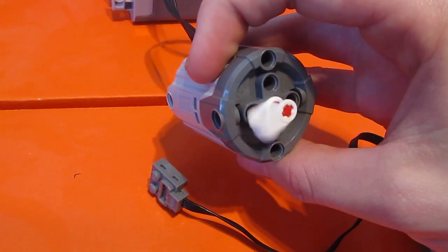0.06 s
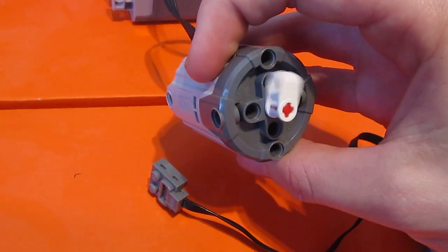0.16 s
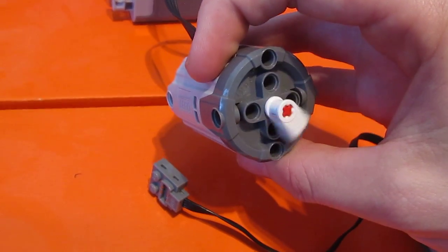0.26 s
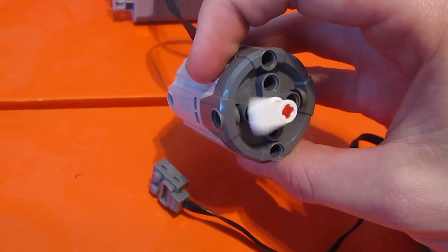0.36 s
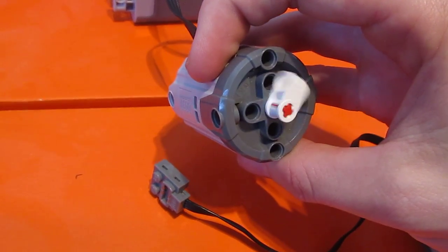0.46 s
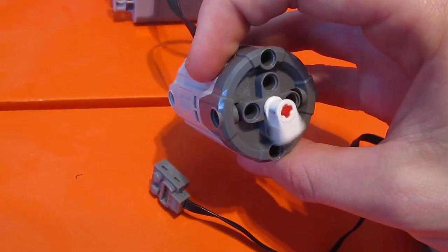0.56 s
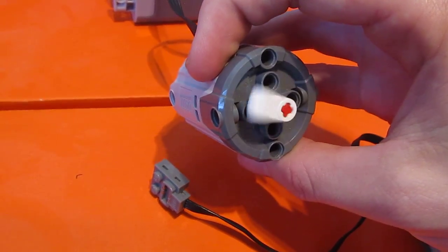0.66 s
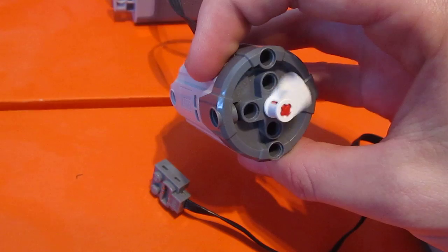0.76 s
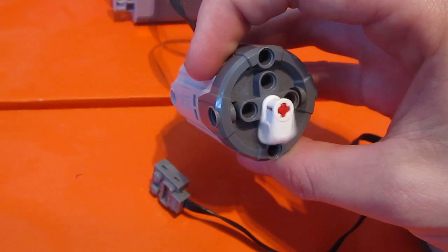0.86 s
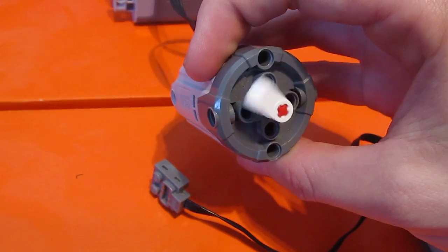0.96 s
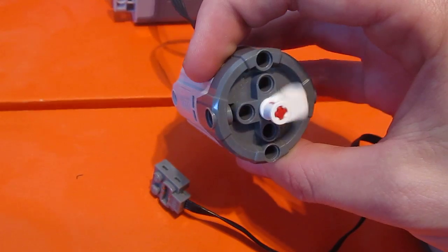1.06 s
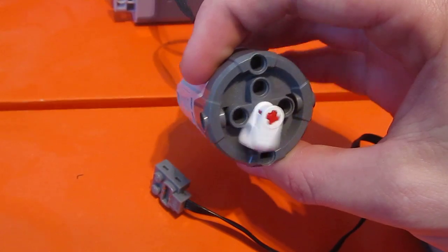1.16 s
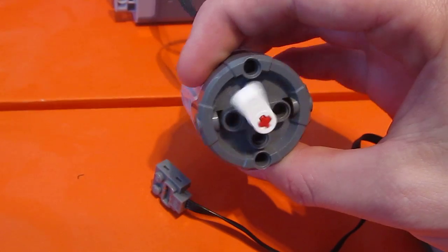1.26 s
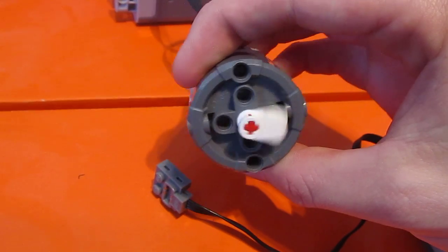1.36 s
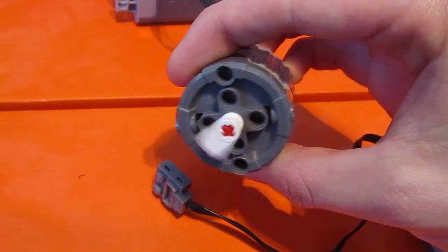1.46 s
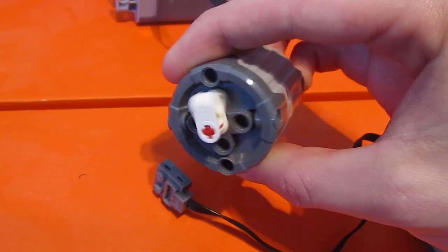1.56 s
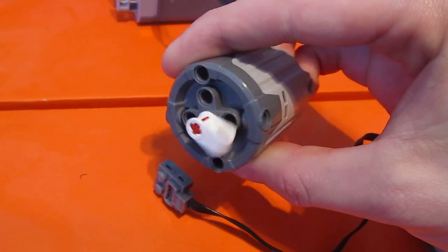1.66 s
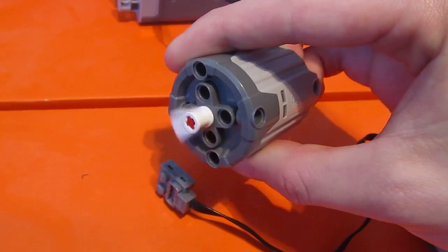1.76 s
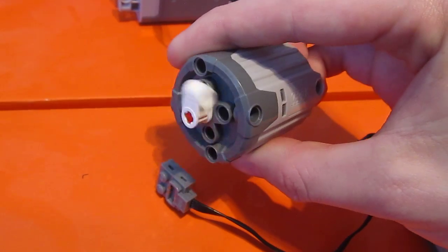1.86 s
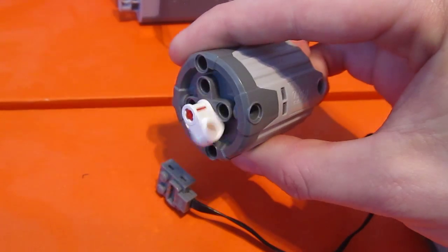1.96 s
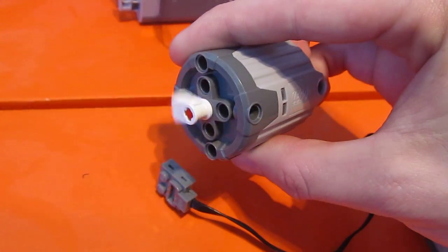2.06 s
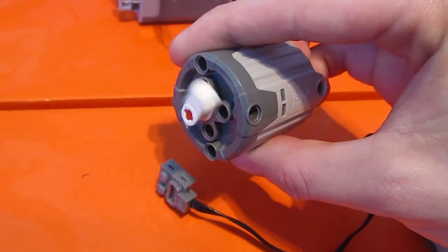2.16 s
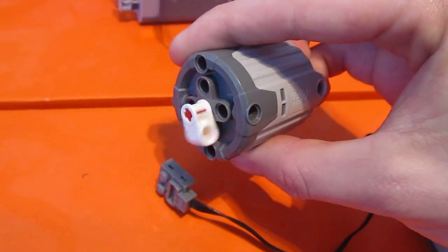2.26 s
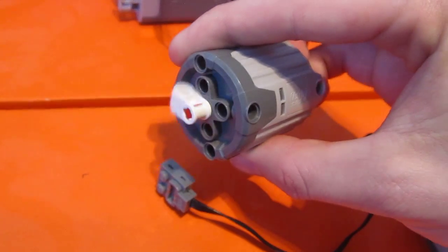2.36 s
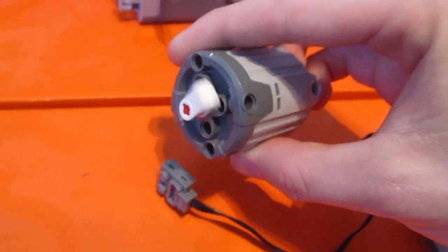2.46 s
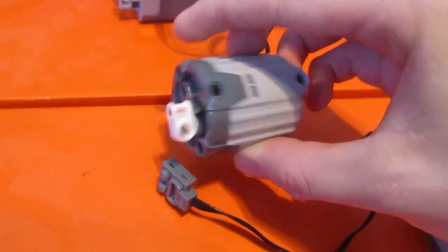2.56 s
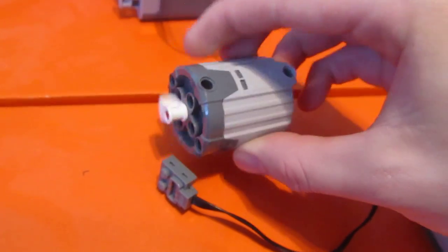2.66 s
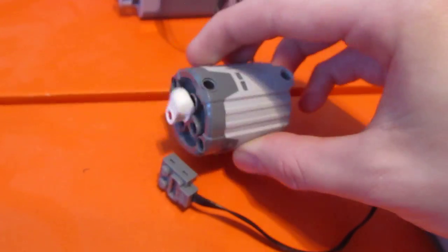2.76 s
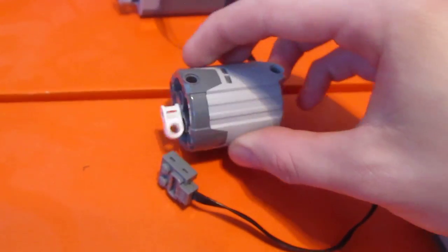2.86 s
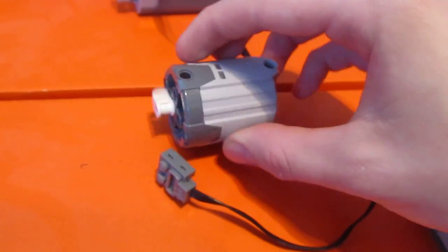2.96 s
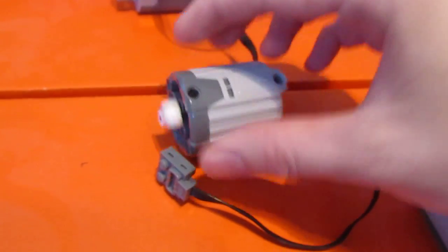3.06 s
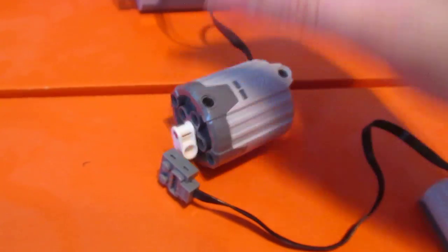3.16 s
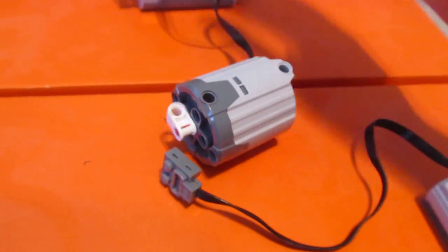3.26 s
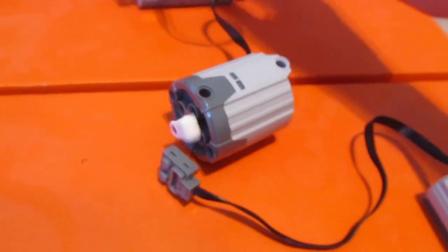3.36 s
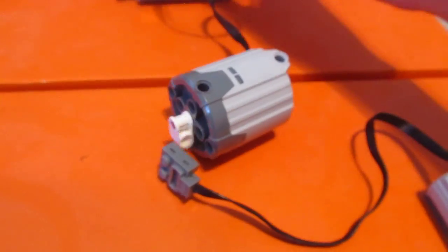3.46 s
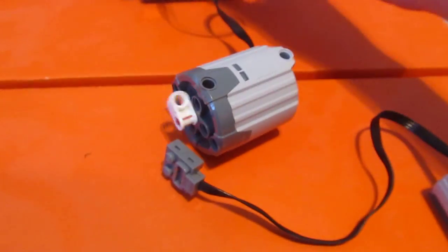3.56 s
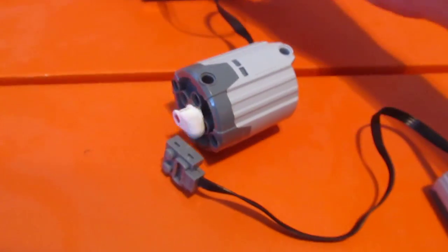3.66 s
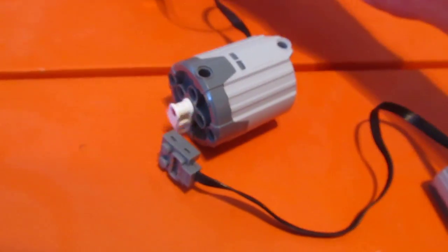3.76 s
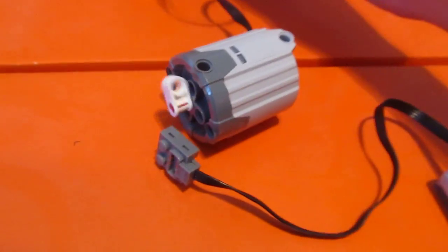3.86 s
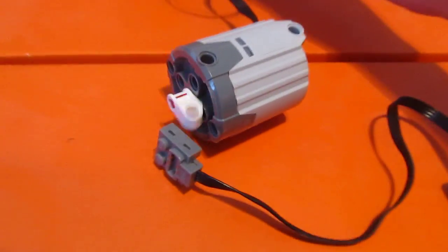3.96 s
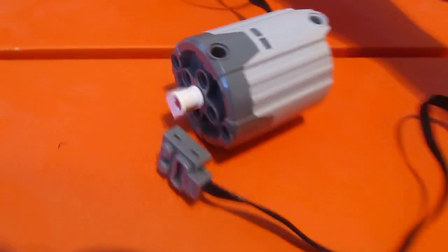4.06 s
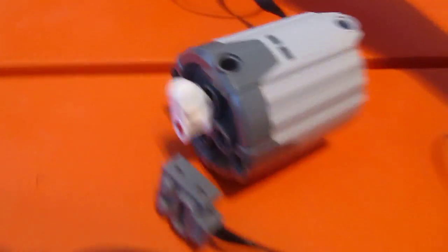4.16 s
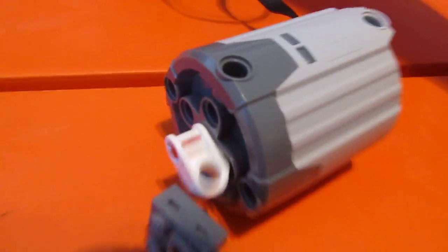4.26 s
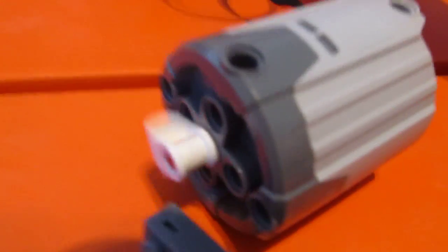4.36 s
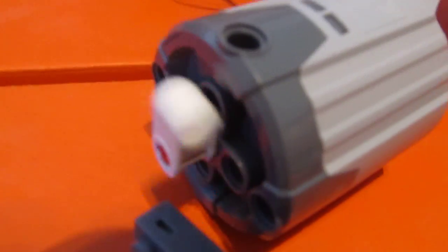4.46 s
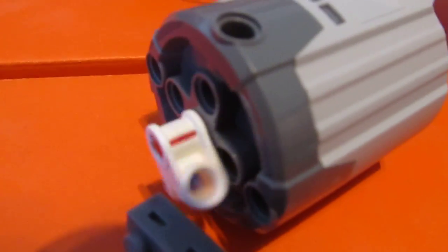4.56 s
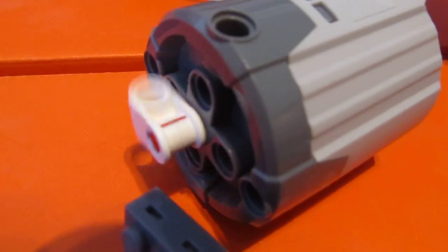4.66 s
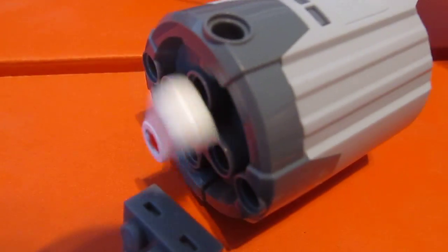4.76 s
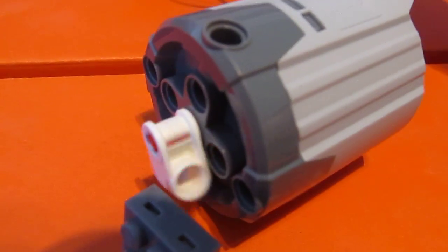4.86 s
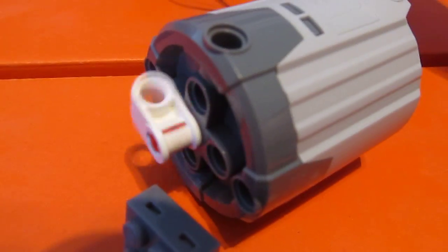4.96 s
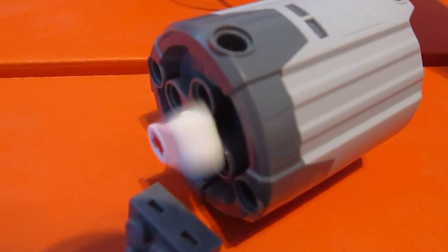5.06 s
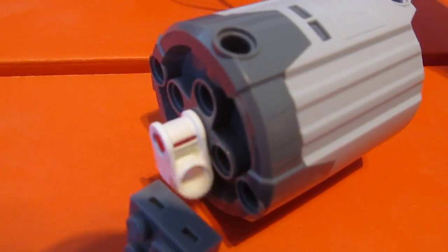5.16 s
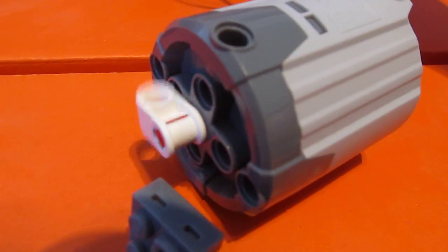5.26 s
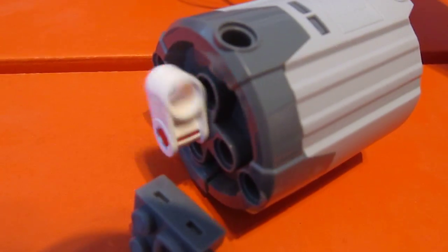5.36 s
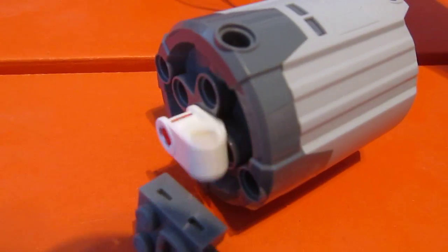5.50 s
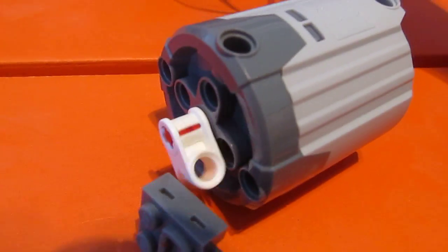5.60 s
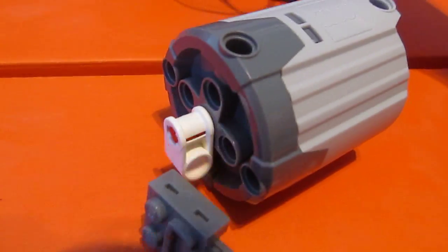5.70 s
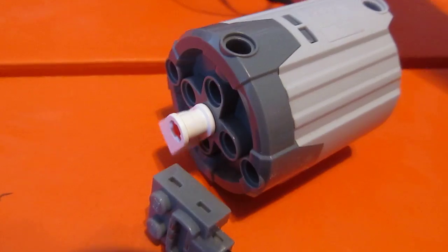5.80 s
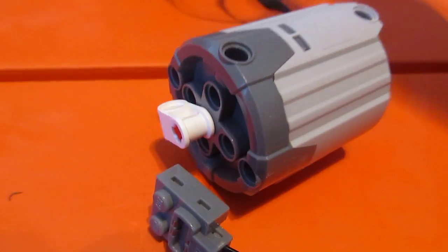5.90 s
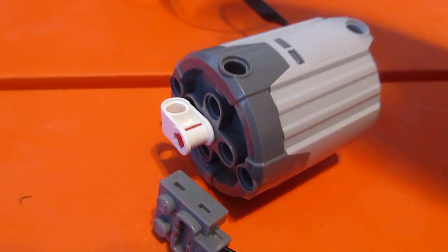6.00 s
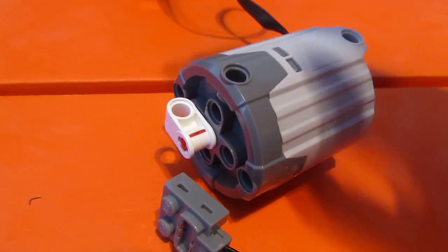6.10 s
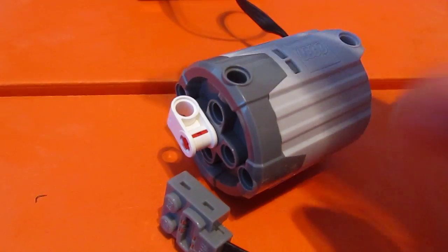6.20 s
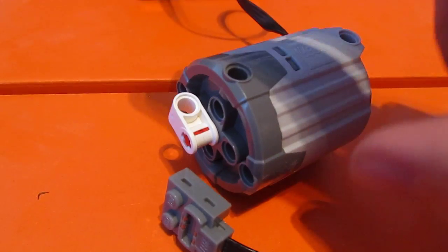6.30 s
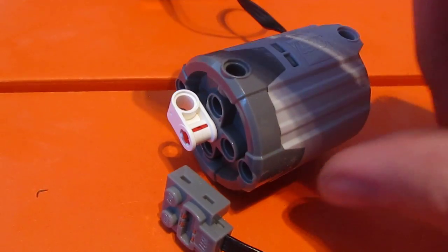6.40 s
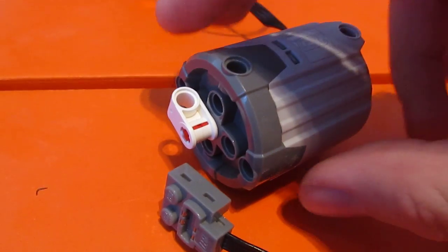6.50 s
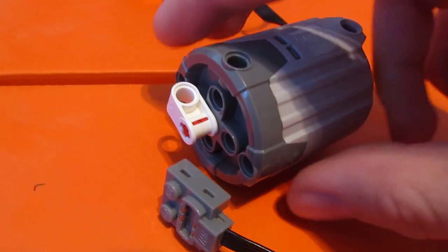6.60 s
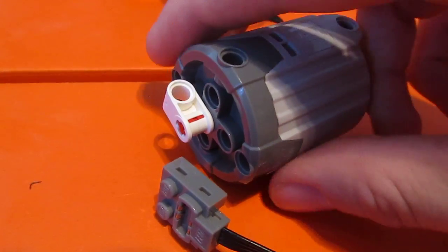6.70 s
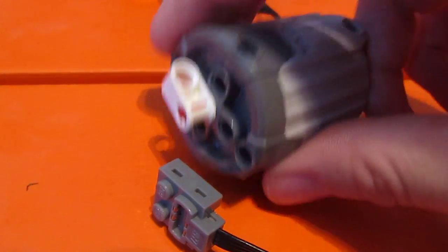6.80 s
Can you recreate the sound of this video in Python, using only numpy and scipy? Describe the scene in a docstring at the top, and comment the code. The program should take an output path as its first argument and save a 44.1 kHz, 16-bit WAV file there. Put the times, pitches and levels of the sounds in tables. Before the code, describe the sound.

A small geared toy motor runs steadily in a hand, its plastic teeth rattling and rasping. It is set down on a plastic table with two quick clusters of hard knocks, and the tabletop then hums and buzzes along with it. The power cuts and the motor winds down, falling in pitch, with a few last gear ticks. Fingers faintly tap and rub the housing. The sound is close, in a quiet room.

```python
"""In a quiet room, a small geared toy motor runs in a hand, its teeth rattling and scraping.
It is turned side-on and set down on a plastic table, which thuds and then buzzes with it.
The power is cut: the rotor coasts to a stop with a few last ticks of the gears.
Fingers then brush the housing and nudge it. The recorder's gain ducks after the hard blows."""
import sys
import numpy as np
from scipy import signal
from scipy.fft import rfft, irfft, next_fast_len
from scipy.io import wavfile
from scipy.ndimage import uniform_filter1d

SR = 44100
rng = np.random.default_rng(int(sys.argv[2]) if len(sys.argv) > 2 else 0)


def int16_out(signal):
    """Quantize to a 16-bit WAV file."""
    q = np.round(np.clip(np.atleast_2d(signal).T, -1, 1) * 32767)
    wavfile.write(sys.argv[1], SR, q.astype(np.int16))


N = 301644
TIME = np.arange(N) / SR
FFT_SIZE = 2 * next_fast_len(N // 2 + 8192)
FREQ = np.maximum(np.arange(FFT_SIZE // 2 + 1) * SR / FFT_SIZE, 1)
RUN_HZ = 127.2   # turns per second of the rotor, the motor's spinning core
GEAR_RATIO = 6   # rotor turns per turn of the carrier, which holds the small planet gears

# the housing hits the table: (time [s], level [dB], brightness [Hz])
BLOWS = [(2.8276, -10, 1100), (2.8505, 1.5, 2400), (2.8627, -5, 1000), (3.1448, -4, 1600),
         (3.1473, -8, 2200), (3.157, -13, 1300), (3.1947, 4, 1840), (3.2051, -0.5, 1015),
         (6.6578, -29.5, 1000), (6.78, -31.5, 1100), (6.794, -33, 1400), (6.805, -30, 2530),
         (6.8102, -34, 2500)]
# stereo spread of the lying motor, and the default: (frequency [Hz], side minus mid [dB])
WIDTH_LYING = [(300, -18), (2300, -10), (3700, -9.5), (4400, -2), (5000, -7), (8000, -3), (14000, -3)]
# its lean to the left or right: (frequency [Hz], left minus right [dB])
PAN_LYING = [(1000, 0), (2200, -2.5), (3000, 1.5), (4000, -8), (5000, 2.5), (5600, -7), (6400, 5),
             (7700, -2.5), (11000, -2), (13500, -6.5)]


def from_db(db):
    """Turn decibels into a gain."""
    return 10 ** (np.asarray(db) / 20)


def unit_power(x):
    """Scale to an average power of 1."""
    return x / np.sqrt(np.mean(x ** 2) + 1e-20)


def in_time(rows):
    """Draw lines through (time, values...) rows: one curve per value column."""
    times, *columns = np.transpose(rows)
    return [np.interp(TIME, times, column) for column in columns]


def gains(points):
    """Turn (Hz, dB) rows into a gain at every frequency."""
    hz, db = np.transpose(points)
    return from_db(np.interp(np.log(FREQ), np.log(hz), db))


def body(colour, ripple_db=2.0):
    """How an object filters sound: a broad tone colour with many narrow peaks."""
    ripple = np.interp(FREQ, np.arange(1500, 16500, 75), rng.standard_normal(200), left=0)
    cepstrum = irfft(np.log(unit_power(gains(colour) * from_db(ripple_db * ripple))))
    # minimum phase: the object rings after a hit, never before
    cepstrum[1:FFT_SIZE // 2] *= 2
    cepstrum[FFT_SIZE // 2 + 1:] = 0
    return np.exp(rfft(cepstrum))


def radiate(pair, colour, width=WIDTH_LYING, pan=PAN_LYING, direct=.5):
    """Send a mid (centre) and a side signal through an object, out to left and right."""
    mid, side = rfft(pair, FFT_SIZE) * body(colour)
    # the direct sound reaches the left a little later
    side = (np.sqrt(1 - direct ** 2) * side - 1j * direct * mid) * gains(width)
    lean = gains(pan)
    left_right = np.array([(mid + side) * lean, mid - side]) * 2 / (1 + lean)
    return irfft(left_right)[:, :N]


def drift(per_s):
    """A random wandering curve of power 1."""
    points = rng.standard_normal(int(N / SR * per_s) + 2)
    return unit_power(np.interp(TIME * per_s, np.arange(len(points)), points))


def grains(per_s, spread_db):
    """Tiny random contacts of uneven size, as a mid and side pair."""
    touches = rng.random(N) < per_s / SR
    sizes = from_db(spread_db * np.clip(rng.standard_normal(N), -2, 2))
    return unit_power(touches * sizes * rng.standard_normal((2, N)))


def beats(cycles, jitter_ms, spread_db):
    """One click per cycle, a little uneven in time and size."""
    at = np.flatnonzero(np.diff(np.floor(cycles)) > 0)
    late, size = rng.standard_normal((len(at), 2)).T
    at = at + (late * jitter_ms * 1e-3 * SR).astype(int)
    out = np.zeros(N)
    out[np.clip(at, 0, N - 1)] = from_db(spread_db * np.clip(size, -2, 2))
    return out


def clicks(rows):
    """One click for each row that starts with (time [s], level [dB])."""
    out = np.zeros(N)
    for s, db, *_ in rows:
        out[round(s * SR)] += from_db(db)
    return out


def fade(hits, t60):
    """Give each click a tail that falls 60 dB in t60 seconds."""
    return signal.lfilter([1], [1, -from_db(-60 / (t60 * SR))], hits + 1e-18)


def even(pair):
    """Level out slow changes in loudness and keep the fast pulsing."""
    return pair / np.sqrt(np.abs(uniform_filter1d(pair[0] ** 2, SR // 7)) + 1e-9)


def ring(hits, hz, t60):
    """Each click starts a dying sine wave."""
    decay, angle = from_db(-60 / (t60 * SR)), 2 * np.pi * hz / SR
    return signal.lfilter([0, np.sin(angle)], [1, -2 * decay * np.cos(angle), decay ** 2], hits + 1e-18)


def after(s, blend_s):
    """A smooth step from 0 to 1 around time s."""
    return .5 + .5 * np.tanh((TIME - s) / blend_s)


def stroke(s, hold_s, attack_s, t60):
    """A curve that rises, holds and dies away."""
    rise = np.clip((TIME - s) / attack_s, 0, 1)
    return rise * from_db(-60 * np.maximum(TIME - s - hold_s, 0) / t60)


def filtered(x, keep, hz, order=2):
    """Keep the "low" or the "high" side of a frequency."""
    return signal.sosfilt(signal.butter(order, hz, keep, fs=SR, output="sos"), x + 1e-18)


def rotor_speed():
    """Turns per second: steady under power, then braked by drag and dry friction."""
    power_off_s, drag_s, friction_hz_per_s = 5.06, .97, 39.2
    coasting_s = np.maximum(TIME - power_off_s, 0)
    friction_hz = friction_hz_per_s * drag_s
    return np.maximum((RUN_HZ + friction_hz) * np.exp(-coasting_s / drag_s) - friction_hz, 0)


def rotor_kicks(turns):
    """The shaft knocks once a turn, and each of the three magnetic poles adds a kick."""
    shaft = beats(turns + .25, jitter_ms=.15, spread_db=1.6)
    poles = beats(3 * (turns + .25), jitter_ms=.1, spread_db=2.0)
    return shaft, poles


def vigour(pace, loss_db, steepness):
    """Contacts soften as speed is lost, swell where the gears bind, and all but stop at a crawl."""
    # the slowing gears catch and shudder: (time [s], length [s], boost [dB])
    shudders = [(5.911, 0.038, 5.5), (6.078, 0.025, 4)]
    crawl_hz, crawl_db, running_ends_s = 17.2, -13, 6.24
    binding_db = sum(db * stroke(s, length, attack_s=.005, t60=.06) for s, length, db in shudders)
    crawling = .5 + .5 * np.tanh(2 * (crawl_hz - pace * RUN_HZ))
    slowing_db = -loss_db * np.clip(1 - pace, 0, 1) ** steepness
    return from_db(slowing_db + binding_db + crawl_db * crawling) * (1 - after(running_ends_s, 0.018))


def tooth_rasp(pressure, pace):
    """Teeth scrape more sparsely as they slow; low and high treble come from separate contacts."""
    rasp = 0
    for band, per_s, flicker_db in (("low", 11000, 1.7), ("high", 7000, 2.7)):
        contacts = grains(per_s * (0.25 + pace), spread_db=2.1) * pressure
        flicker = from_db(flicker_db * drift(500))
        rasp = rasp + filtered(unit_power(contacts * flicker), band, 9000, order=3)
    return even(rasp)


def housing(rattle, rasp):
    """The gears' tone shifts as the motor faces front, turns side-on, is lowered, lies and slows."""
    # tone of the rattle in each position: (frequency [Hz], level [dB])
    rattle_front = [(650, -46), (1100, -27), (1290, -34), (1330, -19), (1350, -15), (1780, -12.5),
                    (2230, 0.5), (2490, -2), (2920, -12), (4090, -4.5), (5200, -13.5), (6760, -42),
                    (11400, -120)]
    rattle_side = [(650, -58), (1100, -20), (1200, -33), (1250, -17.5), (1900, -7.5), (2110, -1.5),
                   (2860, -12.5), (3610, -12), (4020, -6), (4510, -13), (5200, -16.5), (6760, -22),
                   (11400, -120)]
    rattle_low = [(650, -48), (1100, -18.5), (1260, -15), (1330, -23), (1470, -8), (1770, -9), (2080, -1),
                  (2510, -3), (3210, -7), (3810, 3.5), (5200, -15.5), (6760, -43), (11400, -120)]
    rattle_lying = [(650, -39), (1100, -10.5), (1170, -15.5), (1200, -13.5), (1570, -7.5), (2000, -7),
                    (2220, -1), (2600, -3), (2950, -7.5), (3500, -1.5), (3900, -1), (4510, -11),
                    (5200, -13), (6760, -40), (11400, -120)]
    rattle_slow = [(650, -30), (1100, -9), (1240, -23), (1340, -10), (1800, -10.5), (2230, -4), (3150, -14),
                   (3570, -2), (3810, 3), (4390, -12), (5200, -19), (6760, -38), (11400, -120)]
    # tone of the rasp: (frequency [Hz], level [dB])
    rasp_front = [(2710, -45), (4600, -17), (5230, -22), (5610, -3), (6180, -5.5), (6850, 2.5), (7510, 2),
                  (8150, -7), (8890, -4), (9990, -5.5), (11000, -2), (12800, -9), (15600, -25)]
    rasp_side = [(2710, -35), (4600, -21), (5170, -13), (6000, -2), (6680, 4.5), (7660, -2), (8270, 0.5),
                 (9020, -3.5), (10700, 1), (13500, -13), (15600, -24)]
    rasp_low = [(2710, -30.5), (4600, -8), (5250, -11), (5940, -1.5), (6750, -4.5), (7280, 3.5), (7620, -5),
                (8110, -8), (8840, -4), (11000, -3.5), (12200, -6.5), (15600, -29.5)]
    rasp_lying = [(2710, -38), (4600, -20), (5250, -12.5), (6180, 0.5), (6750, -3.5), (7360, -1),
                  (8020, -5.5), (10600, -2.5), (12100, -8), (15600, -29)]
    rasp_slow = [(2710, -29.5), (4600, -8), (5150, -5), (6250, 4.5), (6990, -1), (7430, 4.5), (7860, -6),
                 (8400, -0.5), (9260, -3.5), (10700, -1.5), (12100, -11), (12800, -13), (15600, -29)]
    # stereo spread: (frequency [Hz], side minus mid [dB])
    width_front = [(700, -24.5), (2300, -7.5), (3600, -10.5), (5200, -4), (6300, 3), (14000, 1)]
    width_side = [(700, -27), (3500, -15.5), (4400, 3.5), (5500, -7), (7000, -2), (8500, -5.5), (14000, -2)]
    width_low = [(700, -16.5), (3700, -16), (4500, -6), (6200, -7.5), (8000, -5), (14000, -4)]
    # stereo lean: (frequency [Hz], left minus right [dB])
    pan_front = [(1000, 4.5), (2200, -1.5), (3500, 0), (4100, 3.5), (5300, -2), (6700, 2.5), (8000, -2.5),
                 (10000, -5), (12500, -11), (15000, -7)]
    pan_side = [(1000, 3.5), (2300, -5.5), (2900, 0.5), (4100, -2.5), (5300, 0.5), (7000, 2), (9000, -2),
                (10500, -8), (13000, -9), (15000, -4)]
    pan_low = [(1000, 0), (4500, -1), (7600, 2.5), (10500, -5), (15000, -7)]
    # from one position to the next: (time [s], blend [s])
    moves = [(1.4, .2), (2.58, .08), (3.3, .06), (5.3, .15)]
    positions = [(rattle_front, rasp_front, width_front, pan_front),
                 (rattle_side, rasp_side, width_side, pan_side),
                 (rattle_low, rasp_low, width_low, pan_low),
                 (rattle_lying, rasp_lying, WIDTH_LYING, PAN_LYING),
                 (rattle_slow, rasp_slow, WIDTH_LYING, PAN_LYING)]
    entered = [1] + [after(s, blend_s) for s, blend_s in moves] + [0]
    out = 0
    for k, (rattle_colour, rasp_colour, width, pan) in enumerate(positions):
        share = entered[k] - entered[k + 1]
        out += radiate(rattle * share, rattle_colour, width, pan)
        out += radiate(rasp * share, rasp_colour, width, pan)
    return out


def gearbox(turns, pace, shaft, poles, landed):
    """Teeth rattle and scrape after each kick, swelling once per turn of the off-centre carrier."""
    # loudness as the motor turns and comes closer: (time [s], rattle [dB], rasp [dB])
    in_hand = [(0.0, -33, -26.5), (0.44, -31.5, -26.5), (0.96, -31.5, -25.5), (2.51, -28.5, -21.5),
               (2.63, -25.5, -22), (2.8, -24, -20)]
    on_table = [(3.42, -26.5, -23), (3.434, -26.5, -23.5), (4.27, -24, -21.5), (4.354, -24, -23.5),
                (5.1, -25.5, -24)]
    rattle_db, rasp_db = in_time(list(in_hand) + list(on_table))
    carrier = turns / GEAR_RATIO
    uneven_teeth = np.interp(carrier, np.arange(18) / 18, rng.standard_normal(18), period=1)
    wobble = np.cos(2 * np.pi * (carrier - .3))
    swell = from_db(wobble * (1.5 - 0.95 * landed) + 0.48 * uneven_teeth + 0.42 * drift(60))
    sliding = 0.39 + 0.59 * pace   # steady sliding gives way to single taps at low speed
    rattle_kicks = fade((0.67 + 0.2 * landed) * shaft + (0.11 + 0.45 * landed) * poles, t60=0.0037)
    rasp_kicks = fade(0.3 * shaft + (0.2 + 0.22 * landed) * poles, t60=0.0091)
    rattle = even(swell * grains(30000, spread_db=0.5) * (0.51 * sliding + rattle_kicks))
    rasp = tooth_rasp(swell * (0.84 * sliding + rasp_kicks), pace)
    jolt = 1 + 0.71 * fade(clicks(BLOWS), t60=0.055)   # each blow on the table shakes the gears
    rattle *= from_db(rattle_db + 0.5) * vigour(pace, loss_db=37.5, steepness=3.37) * jolt
    rasp *= from_db(rasp_db - 0.5) * vigour(pace, loss_db=31, steepness=2.76)
    return housing(rattle, rasp)


def planet_gears(turns, landed):
    """Three gears knock in turn inside the held housing, harder once per turn of the output shaft."""
    # tone of their knocking: (frequency [Hz], level [dB])
    colour = [(200, -38), (400, -17), (600, -4.5), (780, 0.5), (1050, -4), (1400, -10), (2000, -24),
              (3000, -58)]
    start_db, rise_db_per_s = -51.5, 1.3
    knocks = beats(3 * turns / GEAR_RATIO - .1, jitter_ms=.4, spread_db=1.5)
    output_shaft = np.cos(2 * np.pi * (turns / GEAR_RATIO ** 2 - .25))
    pulses = fade(knocks * from_db(0.8 * output_shaft), t60=0.0085)
    chatter = unit_power(grains(12000, spread_db=1.0) * (0.11 + pulses))
    return radiate(chatter * from_db(start_db + rise_db_per_s * TIME) * (1 - landed), colour)


def rotor_tones(rows, turns, waver_db):
    """Pure tones at multiples of the rotor's speed, each wavering in loudness."""
    out = 0
    for multiple, db in rows:
        level = from_db(db + waver_db * drift(6.9))
        out += level * np.sqrt(2) * np.sin(2 * np.pi * (round(multiple) * turns + rng.random()))
    return out


def whine(turns, landed):
    """The spinning rotor sings faintly while the motor is held."""
    # its tones: (multiple of rotor speed, level [dB])
    held_tones = [(3, -74), (6, -71), (9, -55.5), (10, -53.5), (11, -59)]
    return from_db(-5.0) * rotor_tones(held_tones, turns, waver_db=5.0) * (1 - landed)


def room_hiss():
    """Soft room noise comes up as the motor falls quiet."""
    # its loudness: (time [s], level [dB])
    loudness = [(5.3, -60), (6.25, -55), (6.53, -52.5), (6.8, -52.5)]
    # its tone: (frequency [Hz], level [dB])
    colour = [(25, -32), (55, -16), (100, -6.5), (200, -9), (500, -9.5), (1500, -18), (1900, -12),
              (2500, -18), (6200, -20), (7500, -33), (12200, -29), (15500, -44)]
    hiss = radiate(rng.standard_normal((2, N)), colour, width=[(100, 2), (600, -4), (8000, 0.5)],
                   pan=[(100, 0.022), (10000, -.5)], direct=.3)
    return hiss * from_db(in_time(loudness)[0])


def table_knocks():
    """Each blow is a short push that makes the table ring and thud."""
    # notes the table top rings at: (frequency [Hz], level [dB], time to fall 60 dB [s])
    modes = [(166, -28.5, 0.21), (250, -20.5, 0.083), (305, -17, 0.058), (340, -18.5, 0.18),
             (431, -13, 0.067), (560, -14.5, 0.025), (735, -42.5, 0.065), (887, -24, 0.025),
             (1028, -21, 0.099), (1100, -23, 0.04), (1340, -29, .05), (1535, -51, 0.084),
             (1830, -35, 0.039)]
    # tone of the thud: (frequency [Hz], level [dB])
    thud_colour = [(24, -37), (40, -19), (76, -20), (139, -4.5), (315, -1.5), (558, -5), (626, -3.5),
                   (679, -11), (1110, -8), (2000, -24.5), (2600, -57), (4400, -120)]
    force = sum(filtered(clicks([(s, db)]), "low", hz) for s, db, hz in BLOWS)
    ringing = sum(from_db(db) * ring(force, hz, t60) * (-1) ** k for k, (hz, db, t60) in enumerate(modes))
    hits = clicks(BLOWS)
    tails = fade(hits, t60=0.069) + from_db(-20.0) * fade(hits, t60=0.26)
    thud = radiate(rng.standard_normal((2, N)) * tails, thud_colour)
    return filtered(from_db(20) * force + from_db(3.5) * ringing + from_db(-11.0) * thud, "high", 120)


def table_buzz(turns, pace, kicks, landed):
    """The motor shakes the table: a hum that fades as it slows, and a buzz where the housing chatters."""
    # loudness of the shaking: (time [s], level [dB])
    loudness = [(3.42, -35.5), (4.112, -31.5), (4.116, -31), (5.1, -33.5)]
    # tone of the buzz: (frequency [Hz], level [dB])
    colour = [(35, -48), (60, -24), (119, -8.5), (199, -16.5), (250, -2.5), (332, -7), (625, -3),
              (786, -7.5), (852, -6), (1190, -7.5), (1500, -7.5), (1950, -21), (3300, -120)]
    # tones of the hum: (multiple of rotor speed, level [dB])
    hum_tones = [(1, -50), (2, -64.5), (3, -39), (4, -44.5), (5, -54.5), (6, -42.5), (7, -45), (9, -42),
                 (10, -49), (11, -44.5), (12, -43.5), (14, -50), (15, -46), (19, -43.5)]
    level = from_db(in_time(loudness)[0] - 2.5) * landed * vigour(pace, loss_db=8.5, steepness=2.83)
    chatter = even(grains(9000, spread_db=4.5) * (0.5 + fade(kicks, t60=0.0072)))
    buzz = radiate(chatter * level, colour)
    # the lopsided rotor's shake fades quickly as it slows; the tug of its three poles lasts
    shake_tones = [row for row in hum_tones if round(row[0]) % 3]
    tug_tones = [row for row in hum_tones if round(row[0]) % 3 == 0]
    shake = rotor_tones(shake_tones, turns, waver_db=2.0) * pace ** 2.06
    tug = rotor_tones(tug_tones, turns, waver_db=1.5) * pace ** 0.52
    hum = (shake + filtered(tug, "high", 264)) * level / level.max()
    # the table top booms as the falling tones pass its own low note
    boom = from_db(-46.0) * ring(hum + (1.5 - 0.74 * pace) * buzz, hz=273.0, t60=0.066)
    # briefly balanced on one edge, the housing rocks with the rotor
    rocking = np.sin(2 * np.pi * turns) * landed * (1 - after(3.02, 0.011))
    surface = from_db(-1.5) * buzz + from_db(0.66) * hum + boom
    return filtered(surface, "high", 144) + from_db(-34) * rocking   # small surfaces give little bass


def snaps(rows):
    """Each contact is a sharp crackle with a faint tail."""
    hits = clicks(rows)
    return grains(30000, spread_db=1.5) * (fade(hits, t60=0.0072) + from_db(-21) * fade(hits, t60=0.18))


def ticks():
    """Single contacts of teeth and fingertips ring the housing; gentle gear ticks sound duller."""
    # teeth snap across their slack as the load goes: (time [s], level [dB])
    gear_ticks = [(5.4852, -11), (5.7112, -9), (5.762, -12.5), (5.8109, -27), (5.8536, -20), (5.8755, -25),
                  (5.884, -19), (5.9226, -10), (5.9448, -14), (5.995, -25), (6.072, -17), (6.094, -29),
                  (6.11, -28), (6.1365, -31), (6.156, -32), (6.188, -31), (6.2166, -37), (6.2325, -29.5),
                  (6.2504, -41), (6.31, -42)]
    # fingertips touch the housing: (time [s], level [dB])
    finger_taps = [(6.551, -28), (6.564, -31)]
    # tone of the tapped housing: (frequency [Hz], level [dB])
    colour = [(100, -30), (260, -1), (800, -4), (2200, -2.5), (3000, -15), (3800, -2), (5100, -13),
              (6400, 1.5), (8000, -3), (11000, -3.5), (15500, -26)]
    dull_below_db = -26.5
    dull_parts = [(s, min(db, dull_below_db)) for s, db in gear_ticks]
    sharp_parts = [(s, db + 1.7 * min(db - dull_below_db, 0)) for s, db in gear_ticks]
    dull = filtered(snaps(dull_parts), "low", 1600, order=1)
    sharp = snaps(sharp_parts + list(finger_taps))
    return radiate(from_db(-6.5) * sharp + from_db(6.0) * dull, colour)


def finger_rubs():
    """Skin drags over ribbed plastic and sets the housing ringing."""
    # each rub: (time [s], hold [s], scuff [dB], ring [dB])
    rubs = [(6.587, 0.022, -42.5, -44), (6.614, 0.036, -51, -53), (6.663, 0.072, -48.5, -60),
            (6.796, .008, -47, -39)]
    # tone of the scuff: (frequency [Hz], level [dB])
    colour = [(100, -13), (300, -8), (600, -6), (1400, -17), (1950, -3), (2500, -6.5), (4300, -7),
              (7000, -18), (11000, -23), (14000, -38)]
    scuff_level, ring_level = 0, 0
    for s, hold_s, scuff_db, ring_db in rubs:
        pressure = stroke(s, hold_s, attack_s=.005, t60=0.072)
        scuff_level += pressure * from_db(scuff_db)
        ring_level += pressure * from_db(ring_db)
    slips = grains(9000, spread_db=1.0)
    ringing = unit_power(ring(slips[0], hz=1940, t60=0.022))
    return radiate(slips * scuff_level, colour) + ring_level * ringing


def gain_control(x):
    """The gain ducks when the sound passes a limit, then comes back at a steady rate."""
    limit_db, attack_s, recovery_db_per_s = -13, 0.007, 32
    power = np.abs(uniform_filter1d(np.mean(x ** 2, axis=0), SR // 200))
    excess_db = np.maximum(10 * np.log10(power + 1e-12) - limit_db, 0)
    recovered_db = recovery_db_per_s * TIME
    cut_db = np.maximum.accumulate(excess_db + recovered_db) - recovered_db
    smoothing = np.exp(-1 / (attack_s * SR))
    return x * from_db(-signal.lfilter([1 - smoothing], [1, -smoothing], cut_db))


def scene():
    """The rotor's turning drives every running part; a quiet room lies under it all."""
    speed = rotor_speed()
    turns = np.cumsum(speed) / SR
    pace = speed / RUN_HZ   # 1 at full speed, 0 at rest
    landed = after(2.86, blend_s=.01)   # 0 in the hand, 1 on the table
    shaft, poles = rotor_kicks(turns)
    motor = whine(turns, landed) + gearbox(turns, pace, shaft, poles, landed) + planet_gears(turns, landed)
    table = table_buzz(turns, pace, 0.49 * shaft + poles, landed) + table_knocks()
    return motor + table + room_hiss() + ticks() + finger_rubs()


def record(dry):
    """The gain ducks after hard blows, whose first peaks clip; the highest treble is cut steeply."""
    cutoff_hz = 15600
    clipped = np.clip(gain_control(dry), -1, 1)
    treble_cut = 1 / np.sqrt(1 + (FREQ / cutoff_hz) ** 300)
    return irfft(rfft(clipped, FFT_SIZE) * treble_cut)[:, :N]


dry = scene()
out = record(dry)
int16_out(out)
```